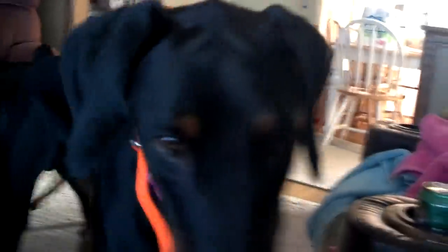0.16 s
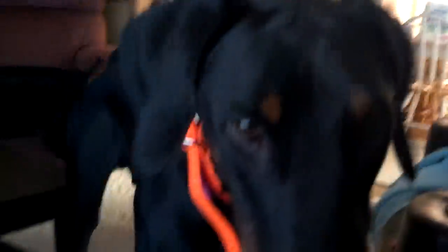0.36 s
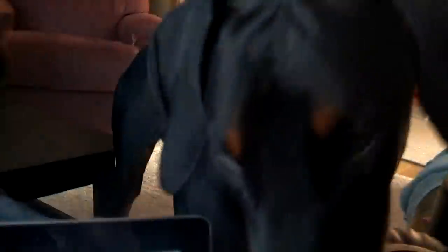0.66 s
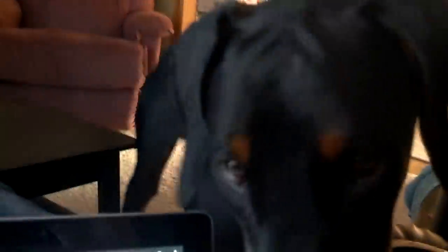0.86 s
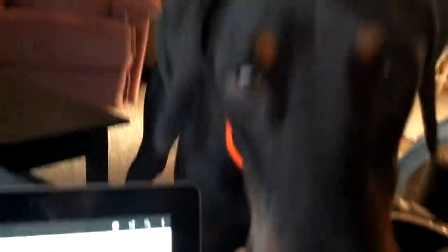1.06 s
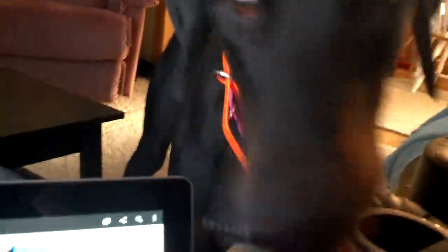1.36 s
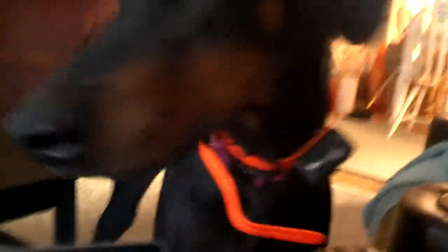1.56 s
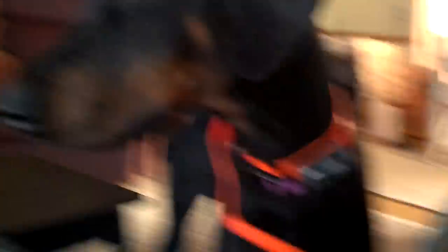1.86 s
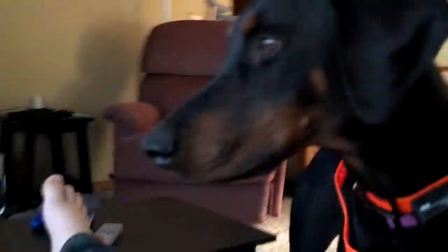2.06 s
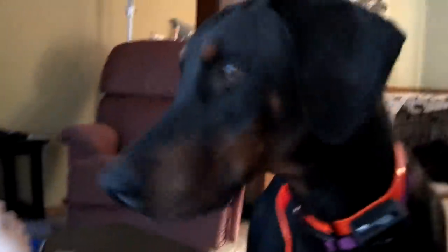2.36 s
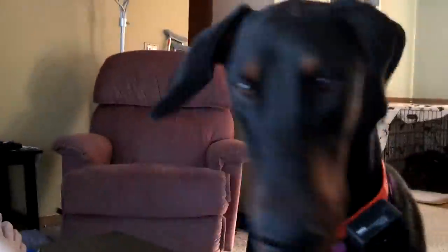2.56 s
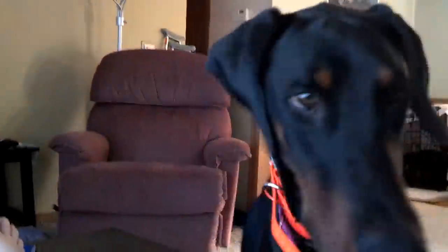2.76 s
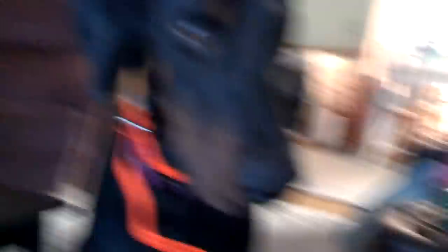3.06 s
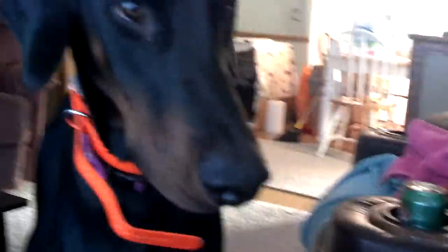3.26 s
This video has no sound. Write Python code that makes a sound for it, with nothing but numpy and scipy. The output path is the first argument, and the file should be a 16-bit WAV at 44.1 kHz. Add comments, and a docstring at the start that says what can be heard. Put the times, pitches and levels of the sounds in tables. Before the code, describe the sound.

Dog barking in a living room: one single bark, a pause, then a quick run ending in a yelp

```python
"""Over steady room tone in a carpeted living room, a dog out of view barks once, as pulse partials and noise puffs.
Small ticks and thuds, short dying sines, follow; then six barks come in a run, each ringing on in the room.
A second dog snorts softly close by, as coloured noise, under the fourth and fifth of the run; the fifth carries
a higher yelp, and the sixth, after the snort, is a yelp alone. More thuds end it.
Two ports a hand apart are delayed and subtracted into a left-right pair."""
import sys
import numpy as np
from scipy import signal
from scipy.fft import rfft, irfft, next_fast_len
from scipy.io import wavfile
from scipy.ndimage import uniform_filter1d

SR = 44100
rng = np.random.default_rng(int(sys.argv[2]) if len(sys.argv) > 2 else 0)


def log_audio(samples):
    """Write samples as a 16-bit WAV file to the path given in sys.argv[1]."""
    # one column per channel
    frames = np.atleast_2d(samples).T
    # limit to full scale, then quantise
    limited = np.clip(frames, -1, 1)
    pcm = np.round(limited * 32767).astype(np.int16)
    wavfile.write(sys.argv[1], SR, pcm)


N = 149940  # samples
EDGE_HZ = 15780  # upper band limit


def gain_of(db):
    """dB to amplitude gain."""
    return 10 ** (np.asarray(db) / 20)


def evened(x):
    """Scales to rms 1."""
    return x / np.sqrt(np.mean(x ** 2) + 1e-20)


def read(points, hz):
    """Interpolates a spectrum table on a log frequency axis."""
    f, value = np.transpose(points)
    return np.interp(np.log(hz + 1), np.log(f + 1), value)


def coloured(x, points):
    """Zero-phase filter with the gains of a spectrum table."""
    size = next_fast_len(x.shape[-1] + 2048)
    gain = gain_of(read(points, np.fft.rfftfreq(size, 1 / SR)))
    return irfft(rfft(x, size) * gain, size)[..., :x.shape[-1]]


def lagged(x, lag_s):
    """Delays by a phase slope, so by any fraction of a sample."""
    hz = np.fft.rfftfreq(len(x), 1 / SR)
    return irfft(rfft(x) * np.exp(-2j * np.pi * hz * lag_s), len(x))


def curve(points):
    """A (t/s, level/dB) table as gain over the whole scene."""
    return gain_of(np.interp(np.arange(N) / SR, *np.transpose(points)))


def room_tone():
    """Steady noise, partly shared by the ports, partly opposed."""
    # spectra in phase and in antiphase at the ports: f/Hz, density/(dB per Hz) before the level drift
    floor_same = [(40, -88.5), (80, -88.5), (130, -79), (200, -80.5), (350, -83.5), (550, -88.5),
                  (900, -95.5), (1700, -100.8), (2300, -104.4), (3400, -108.5), (4800, -111.3),
                  (7500, -115.0), (10300, -117.5), (13000, -114.2), (15400, -111.4)]
    floor_opposed = [(40, -101.1), (80, -93.5), (130, -88), (200, -90.5), (350, -89), (550, -92),
                     (900, -100.1), (1700, -99.9), (2300, -104.0), (3400, -108.7), (4800, -111.8),
                     (7500, -115.5), (10300, -117.4), (13000, -112.1), (15400, -115.8)]
    # slow level drift: t/s, level/dB
    floor_drift = [(0, 0.5), (.1, 1.5), (.7, -0.7), (.95, 0.5), (1.3, -1.3), (3.4, 1.9)]
    # sqrt(SR / 2) gives unit density per Hz
    a, b = rng.standard_normal((2, N)) * np.sqrt(SR / 2) * curve(floor_drift)
    same, opposed = coloured(a, floor_same), coloured(b, floor_opposed)
    return np.array([same + opposed, same - opposed])


def bark(rows, mouth_size, closing_db, peak_hz, peak_db, thin_db, vowel_db):
    """Strong-weak pulses as a sum of half-order partials, plus puffs of noise, through the throat."""
    # throat and mouth response: f/Hz, level/dB
    throat_common = [(200, -85), (300, -11), (400, 5), (500, -0.5), (650, -0.5), (1000, -8.5),
                     (1400, -10.5), (1800, -23.5), (2200, -17), (2700, -36.5), (3200, -28), (3700, -35.5),
                     (5500, -41.5), (8300, -53), (16000, -62.5)]
    # f/Hz of the vowel departures
    vowel_hz = [380, 520, 780, 1050, 1450, 1900, 2600, 3600, 6500]
    jitter, jitter_s, puff_share = .006, .006, .6
    thin_s, thin_hz = 0.046, 850  # lows swell in over thin_s, below thin_hz
    peak_width_oct, puff_tilt_db_per_oct = 0.043, -4

    s, *cols = np.transpose(rows)
    start = round(s.min() * SR)
    t = np.arange(N)[start:][:SR // 4] / SR
    hz, level_db, sub, rough = (np.interp(t, s, c) for c in cols)
    rough = np.clip(rough, 0, 1)

    # pitch wanders more where the voice is rough
    wander_noise, puff_noise = rng.standard_normal((2, len(t)))
    wander = evened(uniform_filter1d(wander_noise, round(jitter_s * SR)))
    hz = hz * (1 + jitter * (1 + 4.04 * rough) * wander)
    turns = np.cumsum(hz) / SR

    f = np.geomspace(100, 20000, num=160)
    colour_db = read(throat_common, f / mouth_size) + read(np.c_[vowel_hz, vowel_db], f)
    resonance_db = peak_db * np.exp(-(np.log2(f / peak_hz) / peak_width_oct) ** 2)
    throat = np.c_[f, colour_db + resonance_db]

    k = np.arange(1, 41)[:, None] / 2  # half orders make every other pulse weaker
    onset_thinning = thin_db * np.clip(1 - (t - t[0]) / thin_s, 0, 1) ** .5
    thin = onset_thinning / (1 + (k * hz / thin_hz) ** 6)
    closing = closing_db * (t - s.mean()) * np.log2(k)
    partials = gain_of(thin + read(throat, k * hz) + closing)
    partials = partials * np.where(k % 1, sub, 1) * (k * hz < EDGE_HZ)
    folds = (partials * np.cos(2 * np.pi * k * turns + 1.3 * k ** 2)).sum(0)

    # noise surges at each pitch cycle
    octaves = np.log2(np.maximum(f, 500) / 500)
    puff_colour = throat + np.outer(puff_tilt_db_per_oct * octaves, [0, 1])
    puffs = coloured((0.9 + np.exp(-(turns % 1) / 1.2)) * puff_noise, puff_colour)

    fade = np.clip((s.max() - t) / 0.005, 0, 1) * np.clip((t - t[0]) / 0.0048, 0, 1)
    voice = np.sqrt(1 - rough ** 2) * evened(folds) + puff_share * rough * evened(puffs)
    out = np.zeros(N)
    out[start:][:len(t)] = fade * gain_of(level_db) * voice
    return out


def tail(x):
    """Room ring: sparse taps of random sign, each band dying at its own speed."""
    # f/Hz, t60/s
    room_decay = [(250, 0.77), (500, 0.49), (1000, 0.57), (2000, 0.56), (4000, 0.44), (8000, 0.46),
                  (14000, 0.034)]
    taps = np.zeros(SR)
    at = np.arange(200, SR - 20, 20)
    taps[at + rng.integers(0, 20, len(at))] = rng.choice([-1., 1.], len(at))
    hz, t, z = signal.stft(taps, SR, nperseg=256)
    decay = gain_of(-60 * t / read(room_decay, hz)[:, None])
    ring = signal.istft(z * decay, SR, nperseg=256)[1]
    ring = ring / np.linalg.norm(ring)
    return signal.fftconvolve(x.T, ring.reshape((-1, 1)[:x.ndim]), axes=0)[:N].T


def far_dog():
    """Barks reach the ports from one side with a tail and room modes; a scattered tail differs at each port."""
    # one table a bark or yelp: t/s, pitch f/Hz, level/dB, half-order weight/(0-1), roughness/(0-1)
    bark_rows = [
        [(.22, 392, -37, 0.2, 0.16), (.238, 430.5, -21, 0.4, 0.4), (.25, 501.8, -10, 0.98, 0.25),
         (.268, 539.4, -22, 1, 0.23), (.29, 502.4, -16, 0.74, 0.42), (.315, 470.3, -19, 0.6, 0.65),
         (.35, 476, -25.5, 0.8, 0.77)],
        [(1.482, 392, -37.5, 0.1, 0.64), (1.512, 420.4, -27.5, 0.5, 0.65), (1.525, 513.2, -15.5, 0.6, 0.38),
         (1.54, 510.2, -14, 0.78, 0.44), (1.555, 481, -15.5, 0, 0.25), (1.575, 469.5, -32, 0.31, 0.1),
         (1.595, 461, -20, 0.24, 0.04), (1.645, 447.2, -26, 0, 0.3)],
        [(1.718, 443.6, -26, 0.55, 0.4), (1.742, 472, -25, 0, 0.4), (1.752, 527, -13.5, 0.47, 0.48),
         (1.775, 495.8, -19, 0.36, 0.31), (1.81, 462.6, -17, 0.13, 0.2), (1.85, 457.6, -25, 0.04, 0.4)],
        [(1.965, 361, -35.5, 0.9, 0.54), (2.001, 471, -26, 1, 0.46), (2.01, 531.3, -11, 0.6, 0.54),
         (2.035, 508, -21, 0, 0.51), (2.055, 463.4, -19, 0.6, 0.42), (2.08, 443.2, -26, 0.4, 0.65),
         (2.11, 425.5, -23, 0.2, 0)],
        [(2.225, 363, -35.5, 0.08, 0.42), (2.26, 452.2, -22.5, 0.6, 0.67), (2.272, 503.1, -21.5, 0.1, 0),
         (2.287, 536.9, -8, 0.03, 0.44), (2.31, 519.5, -27.5, 0.6, 0.46), (2.34, 484.2, -23.5, 0, 0.7),
         (2.375, 402, -25, 0.88, 0.65)],
        [(2.632, 358.6, -36, 0, 0.59), (2.65, 370.4, -32, 0, 0.59), (2.668, 396.4, -27, 1, 0.47),
         (2.682, 472.7, -21, 0.56, .15), (2.7, 518.3, -13, 0, 0.15), (2.73, 528.2, -22, 0.56, 0.42),
         (2.76, 524, -21.5, 0.31, 0.42), (2.79, 527.4, -25, 1, 0.6)],
        [(2.643, 657, -38, .05, 0.43), (2.652, 659.5, -32.5, .05, 0.07), (2.664, 681, -25, 0.5, .1),
         (2.68, 779.4, -25.5, .05, 0), (2.71, 792, -29.5, .05, 0), (2.745, 771.5, -37, 0.3, .2)],
        [(3.037, 612, -40.5, 0.5, 0.77), (3.056, 668, -24, 0, 0.65), (3.066, 773, -21.5, 0.27, 0.21),
         (3.08, 832.3, -17, 0, 0.1), (3.095, 814.7, -26, 0.2, 0.25), (3.12, 815, -20.5, 0.07, 0.08),
         (3.14, 783, -21, 0, 0.14), (3.16, 794, -44, 0.25, 0.42)],
    ]
    # one row a bark or yelp: size factor, tilt drift/(dB per octave per s), resonance f/Hz,
    # resonance level/dB, onset thinning of the lows/dB, lag at the right port/ms
    mouth_rows = [(1.012, -23.5, 1740, 22.5, -10.5, 0.14), (0.987, -17, 4620, 6, -7, 0.12),
                  (0.991, 10.5, 1330, 2.5, -3.5, 0.14), (1.01, -3, 1275, -0.5, -9.5, 0.11),
                  (1.01, -6.5, 2100, 4, -2, .06), (1.012, -18, 1100, 18.5, -9, 0.062),
                  (1.301, -21, 3210, 10, -16.5, 0.053), (1.3, -44, 6620, 7.5, -25, 0.066)]
    # one row a bark or yelp: departure from the common throat/dB at each vowel frequency
    vowel_rows = [(1.1, 13.4, -1.5, 3, 0, -1.4, 14.6, -6.5, 10),
                  (0.102, 0.073, -6, 0.5, -3, -13, 4.1, -10.5, 2.5),
                  (.1, .1, 0.5, -1.5, -3, -13, 10, -12.5, 1), (.1, 0.095, -8.5, -1, -3.1, -3, 2, -8, 5),
                  (.1, .1, -0.2, 2.5, 0.5, 2, 5.6, -10.5, 8), (.1, 0.08, 6.5, -6.6, 5, 0.5, 3, -7.5, 4.5),
                  (0.101, 0.13, 1.5, 10, 3, 14, 13.7, 5, 1.5), (.1, 0.12, 15, 6.5, 11.5, 6, 16, 17, 15)]
    # right port against left: f/Hz, level/dB
    right_shade = [(300, -2.5), (2000, 5.5), (2700, -2.3), (3300, 0), (6000, -2.7)]
    # treble lost on the way: f/Hz, level/dB
    far_loss = [(100, -0.88), (8400, -2), (9600, -8), (16000, -25)]
    # room modes: f/Hz, level/dB, t60/s
    mode_rows = [(468, -7.5, 0.2), (484.5, -18, 0.097)]
    # share that keeps its direction: f/Hz, level/dB
    aimed_share = [(200, 2.84), (1500, -5), (3000, -4.5), (6000, -2), (16000, -25)]
    # share unlike at the ports: f/Hz, level/dB
    scatter_share = [(200, -9), (500, -11.5), (1000, 1), (2000, -2.5), (4000, 0.5), (16000, 19.5)]
    direct_db, tail_db, scatter_db = 0, -8.5, -7

    barks = np.zeros((2, N))
    for rows, (*mouth, lag_ms), vowel_db in zip(bark_rows, mouth_rows, vowel_rows):
        voice = bark(rows, *mouth, vowel_db)
        barks += [voice, coloured(lagged(voice, lag_ms / 1000), right_shade)]
    barks = coloured(barks, far_loss)

    t = np.arange(SR // 2) / SR
    modes = np.zeros(len(t))
    for hz, db, t60_s in mode_rows:
        unit_peak = 2 * np.log(1000) / t60_s / SR  # about 0 dB at resonance
        modes += gain_of(db - 60 * t / t60_s) * np.sin(2 * np.pi * hz * t) * unit_peak

    aimed = gain_of(direct_db) * barks + gain_of(tail_db) * tail(barks)
    aimed += signal.fftconvolve(barks, modes[None])[:, :N]
    scattered = np.array([tail(barks[0]), tail(barks[1])])  # a separate tail per port
    return coloured(aimed, aimed_share) + gain_of(scatter_db) * coloured(scattered, scatter_share)


def knocks():
    """Ticks and thuds: short dying sines with a room tail, the left port lagging."""
    # t/s, level before decay/dB, ring f/Hz, t60/s
    knock_rows = [(0.7105, -44, 1355, 0.023), (.711, -51, 3950, 0.03), (.711, -42, 560, .025),
                  (0.737, -47, 1900, 0.012), (.737, -38, 420, 0.03), (.746, -36, 260, .025),
                  (3.314, -33.5, 458, 0.023), (3.324, -30.5, 228, 0.062), (3.333, -38, 350, 0.028),
                  (3.344, -31, 427, 0.029)]
    tail_db, left_lag_s = -15.5, 0.00014
    out, t = np.zeros(N), np.arange(SR // 10) / SR
    for s, db, hz, t60_s in knock_rows:
        attack = np.minimum(t * hz, 1)  # one cycle long
        ring = gain_of(db - 60 * t / t60_s) * attack * np.sin(2 * np.pi * hz * t)
        part = out[round(s * SR):][:len(t)]
        part += ring[:len(part)]
    out += gain_of(tail_db) * tail(out)
    return np.array([lagged(out, left_lag_s), out])


def snort():
    """A soft rush of air through the near dog's nose: coloured noise, separate at each port."""
    # t/s, level/dB before the common lift
    snort_level = [(2.202, -85), (2.235, -61), (2.28, -50.5), (2.402, -50), (2.51, -48), (2.62, -53.5),
                   (2.66, -57.5), (2.74, -76)]
    # f/Hz, level/dB
    snort_colour = [(500, -5), (1500, -4), (3400, -7), (4800, -7.5), (7500, -8), (10300, -15.5),
                    (13000, -11), (15400, -4)]
    lift_db, flutter_db_rms, flutter_samples = 2.5, 1.2, 900
    air = evened(coloured(rng.standard_normal((2, N)), snort_colour))
    slow = evened(uniform_filter1d(rng.standard_normal(N), flutter_samples))
    flutter = gain_of(flutter_db_rms * slow)
    swell = curve([(0, -120)] + snort_level + [(N / SR, -150)])
    return gain_of(lift_db) * swell * flutter * air


def scene():
    """Sound at the two ports."""
    return room_tone() + far_dog() + knocks() + snort()


def record(dry):
    """Each side is one port minus the delayed other; then the band limit."""
    port_lag_samples = 16
    late = np.pad(dry[::-1], ((0, 0), (port_lag_samples, 0)))[:, :N]
    lowpass = signal.firwin(1023, EDGE_HZ, window=("kaiser", 9), fs=SR)
    return signal.oaconvolve(dry - late, lowpass[None], "same")


dry = scene()
out = record(dry)
log_audio(out)
```